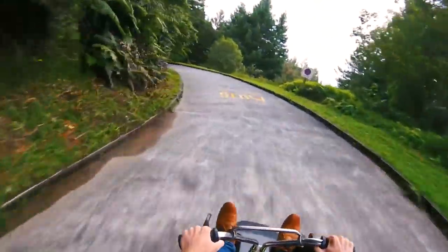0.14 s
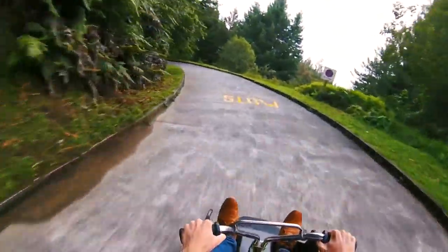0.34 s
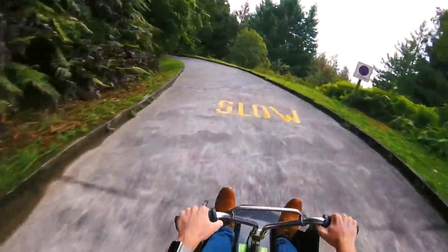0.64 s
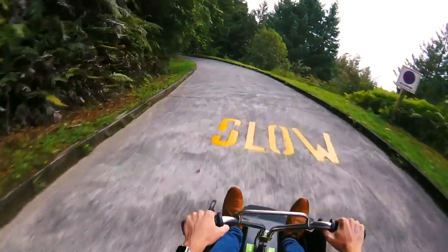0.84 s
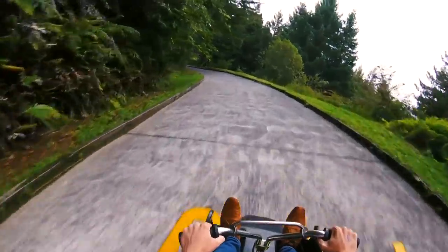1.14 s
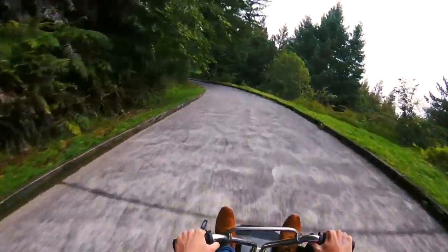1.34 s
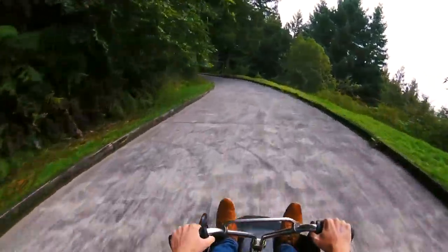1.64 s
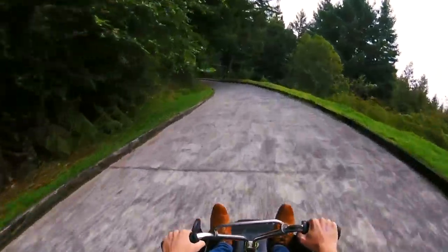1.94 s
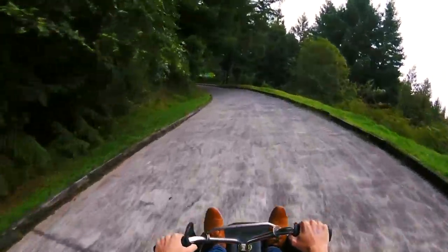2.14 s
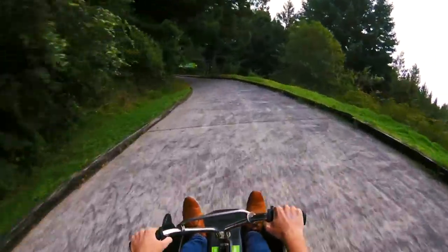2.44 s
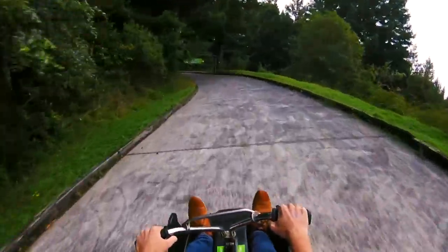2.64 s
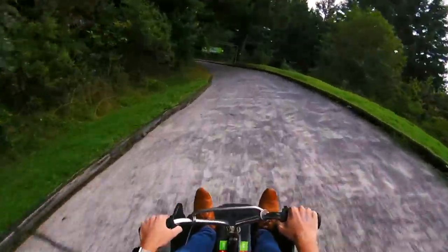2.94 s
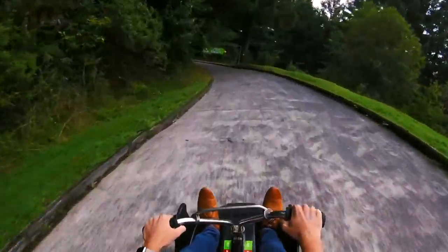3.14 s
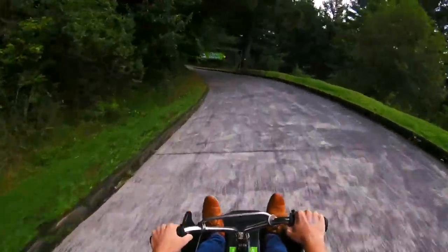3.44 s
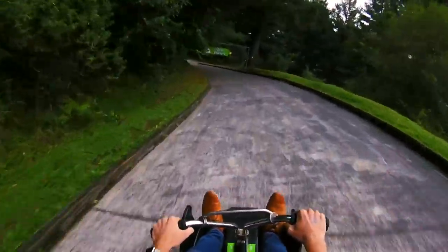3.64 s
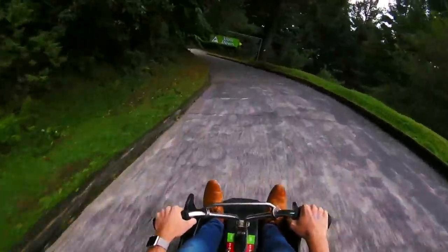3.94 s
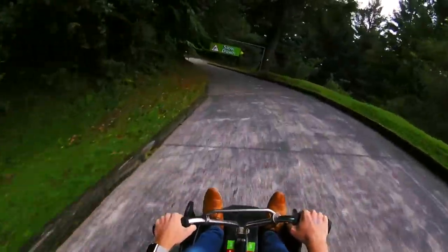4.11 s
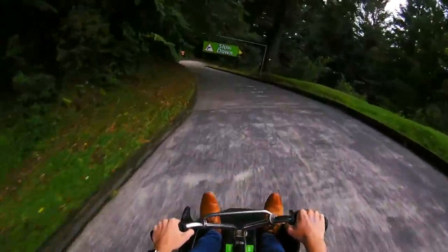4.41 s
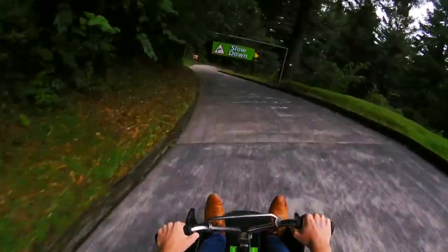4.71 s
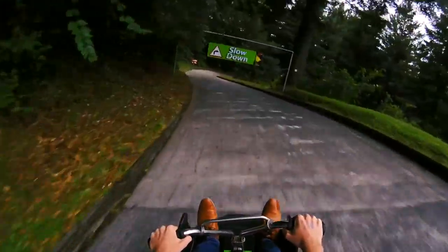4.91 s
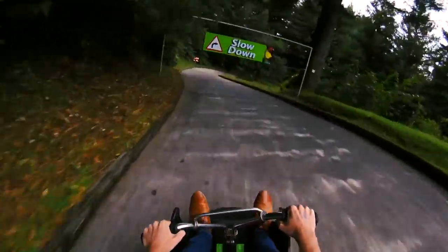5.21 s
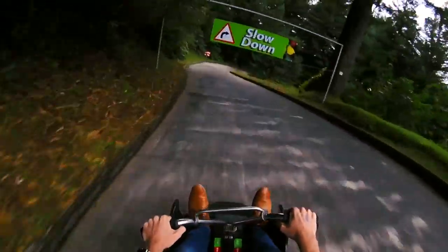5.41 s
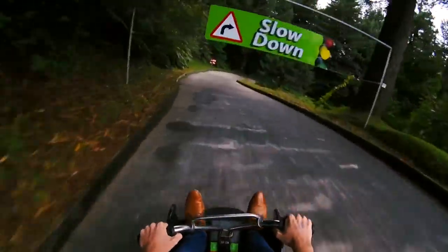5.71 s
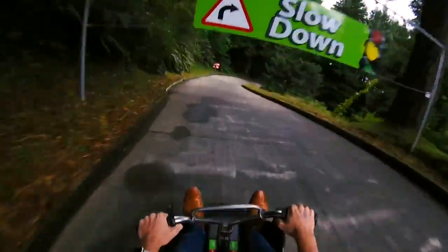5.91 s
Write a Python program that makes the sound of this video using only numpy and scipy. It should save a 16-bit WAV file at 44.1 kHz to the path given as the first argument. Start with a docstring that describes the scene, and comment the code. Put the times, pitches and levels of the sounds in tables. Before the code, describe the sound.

Heard from a microphone worn by the rider outdoors, a plastic cart speeds down rough concrete. A hollow, lumpy rumble and rapid thumps mix with gritty wheel grinding, sand crackle and rattling fittings. Metal chatters midway and the steering column raps. Near the end the surface smooths, the rattle eases, and creaks, a thin whine, swelling low wind and a rough groan emerge.

```python
"""A luge cart coasts fast down a concrete track, heard by a microphone worn by the rider.
From the start, grit and bumps excite the shell, seat and panels; hard wheels grind, knock and scrape through
the frame, sand cracks, joints tap and loose fittings rattle, all as impacts filtered by resonant parts.
Ticks join early; from 2 s a metal part chatters, and from 3 to 3.6 s the steering column raps. After 5.1 s the
concrete is smooth: creaks, a thin whine and a late groan of resonant noise stand out as the air's noise grows."""
import sys
import numpy as np
from scipy import signal
from scipy.fft import rfft, irfft
from scipy.io import wavfile
from scipy.ndimage import uniform_filter1d, minimum_filter1d

SR = 44100
rng = np.random.default_rng(int(sys.argv[2]) if len(sys.argv) > 2 else 0)


def master_out(mix):
    """Clip the mix to full scale and print it as 16-bit PCM to the path in sys.argv[1]."""
    frames = np.transpose(np.atleast_2d(mix))
    ceiling = np.clip(frames, -1, 1)
    pcm = np.round(ceiling * 32767).astype(np.int16)
    wavfile.write(sys.argv[1], SR, pcm)


N = 267246

# bumps that thump the shell: (time [s], level [dB], pitch [Hz])
BUMPS = [(.037, -13.5, 179), (.099, -24, 204), (0.15, -13, 170), (.221, -18.5, 188), (0.295, -22, 180),
         (.411, -16, 204), (.462, -20, 185), (0.501, -14, 188), (0.582, -14.5, 159), (.697, -18.5, 182),
         (.789, -21, 167), (0.87, -17, 172), (0.98, -20, 190), (1.07, -19.5, 185), (1.142, -14.5, 166.6),
         (1.187, -16, 180), (1.259, -18, 216), (1.318, -18, 183), (1.389, -24, 189), (1.465, -19, 190),
         (1.535, -11.5, 174), (1.666, -18, 182), (1.762, -14.5, 190), (1.81, -19, 204), (1.957, -22, 208),
         (2.04, -16, 177), (2.185, -18, 192), (2.255, -15.5, 178), (2.343, -14, 174.5),
         (2.523, -18.5, 171.4), (2.596, -15, 176), (2.687, -15, 223), (2.74, -19, 182), (2.792, -26, 188),
         (2.826, -15, 194), (2.922, -22, 202), (3.011, -13.5, 179), (3.114, -23, 194), (3.326, -16.5, 178),
         (3.442, -16.5, 178), (3.505, -19, 163), (3.588, -18, 198), (3.653, -13, 177.5), (3.78, -14, 186),
         (3.935, -18.5, 191), (4.157, -20, 213), (4.24, -17, 171), (4.362, -15.5, 175), (4.455, -14.5, 186),
         (4.523, -19, 178), (4.565, -17, 207), (4.656, -14.5, 197), (4.732, -17.5, 183),
         (4.769, -15.5, 165), (4.873, -22.5, 195), (4.905, -19, 203), (5.055, -19.5, 192),
         (5.097, -16.5, 182), (5.18, -19, 194), (5.223, -27, 190), (5.388, -23, 167), (5.522, -17, 161),
         (5.647, -20.5, 191), (5.987, -16.5, 203)]
# broad colour of the plastic panels: (frequency [Hz], gain [dB])
PANEL_COLOUR = [(150, -38), (280, 8.5), (380, -1), (550, -3), (700, -10), (900, -22.5), (1400, -34.5),
                (4000, -83), (12000, -100)]


def undb(db):
    """Amplitude gain is 10 to the power of decibels over 20."""
    return 10 ** (np.asarray(db) / 20)


def unit(x):
    """Normalization: scale to a root mean square of 1."""
    return x / np.sqrt(np.mean(x ** 2))


def power(x, size):
    """Short-time power: running mean square over size samples."""
    return np.maximum(uniform_filter1d(x ** 2, size), 1e-14)


def even(x, size):
    """Envelope normalization: hold the running rms near 1, keeping the finer grain."""
    return x / np.sqrt(uniform_filter1d(power(x, size), size))


def walk(length_s):
    """Low-pass noise: smooth random wandering with a spread of 1, averaged twice over length_s."""
    size = max(int(length_s * SR), 1)
    once = uniform_filter1d(rng.standard_normal(N), size, mode="wrap")
    return unit(uniform_filter1d(once, size, mode="wrap"))


def curves(table):
    """Linear interpolation: the columns of a table, joined by straight lines in time."""
    s, *columns = np.transpose(table)
    return [np.interp(np.arange(N) / SR, s, c) for c in columns]


def response(colour, modes=(), size=8192):
    """Minimum-phase impulse response of a part with a broad colour and a few resonances."""
    f = np.maximum(np.fft.rfftfreq(size, 1 / SR), 1)
    hz, db = np.transpose(colour)
    db = np.interp(np.log(f), np.log(hz), db)
    for centre, width, lift in modes:
        db = db + lift / (1 + (2 * (f - centre) / width) ** 2)
    # folding the cepstrum onto positive time makes the response causal
    cepstrum = irfft(np.log(undb(db)))
    cepstrum[1:size // 2] *= 2
    cepstrum[size // 2 + 1:] = 0
    return irfft(np.exp(rfft(cepstrum)))[:size // 2]


def ring(x, part):
    """Linear response: a force convolved with a part's impulse response."""
    return signal.fftconvolve(x, part)[:len(x)]


def add(out, s, x):
    """Superposition: mix x into out from time s."""
    i = max(int(s * SR), 0)
    out[i:i + len(x)] += x[:max(N - i, 0)]


def impacts(per_s, spread_db):
    """Random point process: impulses of scattered size."""
    sizes = undb(spread_db * np.clip(rng.standard_normal(N), -2, 2))
    return (rng.random(N) < per_s / SR) * sizes


def scuff(decay_s, size=2048):
    """Contact envelope: grip builds to a peak at decay_s, then dies away."""
    age = np.arange(size) / (decay_s * SR)
    return age * np.exp(-age)


def blows(table, part, decay_s, size):
    """Rough contact: each blow is a noise burst ringing the part, its level the peak rms over size samples."""
    out, fade = np.zeros(N), scuff(decay_s)
    for (s, db), grit in zip(table, rng.standard_normal((len(table), len(fade)))):
        hit = signal.fftconvolve(grit * fade, part)
        add(out, s, hit * undb(db) / np.sqrt(power(np.pad(hit, size), size).max()))
    return out


def jolts(table, part, size):
    """Impulse excitation: each jolt is one clean push, its level the peak rms over size samples."""
    out = np.zeros(N)
    hit = part / np.sqrt(power(np.pad(part, size), size).max())
    for s, db in table:
        add(out, s, hit * undb(db))
    return out


def booms(table, colour, width_hz, lift_db, size):
    """Load-dependent resonance: each push rings the plastic at a pitch set by how it is loaded."""
    return sum(jolts([(s, db)], response(colour, [(hz, width_hz, lift_db)]), size) for s, db, hz in table)


def shaking(per_s, spread_db, decay_s, smooth, grit_per_s):
    """Clustered collisions: separate grit hits, bunched into loose contacts over a smooth rolling share."""
    energy = np.maximum(ring(impacts(per_s, spread_db) ** 2, scuff(decay_s) ** 2), 0)
    strength = np.sqrt(energy / energy.mean() + smooth ** 2)
    return strength * impacts(grit_per_s, 1.4) * np.sign(rng.standard_normal(N))


def aftershake(table):
    """Transient vibration: a quick swell and a fade after each blow, 1 at its strongest."""
    push, fade = np.zeros(N), scuff(decay_s=0.0078, size=8192)
    for s, db in table:
        add(push, s, fade * undb(db))
    return push / push.max()


def shell(boom_db, growl_db):
    """Structural resonance: concrete grain booms in the hollow shell and growls in its panels; bumps thump it."""
    # broad colour of the shell: (frequency [Hz], gain [dB])
    shell_colour = [(20, -44.5), (45, -28.5), (90, -28), (130, -2.5), (170, 6), (240, 2.5), (300, -8.5),
                    (370, -25), (600, -23), (2000, -71.5), (9000, -115)]
    # resonances of the shell: (frequency [Hz], width [Hz], lift above the colour [dB])
    shell_modes = [(181, 160, 0), (302.2, 12, 4.5)]
    # resonances of the panels: (frequency [Hz], width [Hz], lift above the colour [dB])
    panel_modes = [(421, 61, 5.8), (530, 110, 1.4), (685, 61, 2.2)]
    # thuds of the plastic panels: (time [s], level [dB], pitch [Hz])
    thud_times = [(.235, -19.5, 514), (.428, -26, 458), (.769, -17, 484), (1.019, -17, 515),
                  (1.829, -19.5, 503), (1.945, -16.5, 466), (2.096, -21, 505), (2.149, -28, 554),
                  (2.562, -21.5, 540), (2.611, -12, 560), (2.693, -27, 657), (2.860, -20, 530),
                  (4.168, -23, 503), (4.336, -17.5, 545), (4.457, -23, 544), (5.022, -16.5, 493),
                  (5.788, -17, 540), (5.920, -18, 401)]
    grain = impacts(3000, 0.81) * rng.standard_normal(N)
    boom = even(ring(grain, response(shell_colour, shell_modes)), size=800)
    contacts = shaking(per_s=190, spread_db=4.5, decay_s=0.0015, smooth=1.0, grit_per_s=2000)
    growl = even(ring(contacts, response(PANEL_COLOUR, panel_modes)), size=1000)
    thumps = booms(BUMPS, shell_colour, width_hz=42, lift_db=15, size=600)
    thuds = booms(thud_times, PANEL_COLOUR, width_hz=260, lift_db=14.5, size=260)
    return boom * undb(boom_db) + growl * undb(growl_db) + thumps + thuds


def seat():
    """Impulsive excitation of a plate mode: hard shoves make the seat pan boom."""
    # shoves into the seat pan: (time [s], level [dB])
    shoves = [(.025, -22.5), (.204, -31), (1.102, -21), (1.313, -24), (2.06, -18.5), (2.334, -18),
              (2.837, -18.5), (2.996, -19), (3.135, -18), (3.23, -17.5), (3.637, -21.5), (3.911, -20.5),
              (4.44, -20), (4.876, -25.5)]
    # resonance of the seat pan: (frequency [Hz], width [Hz], lift above the panel colour [dB])
    seat_modes = [(265, 78, 13.5)]
    return jolts(shoves, response(PANEL_COLOUR, seat_modes), size=700)


def drone():
    """Narrow-band resonance: rolling keeps panel modes singing; their notes wander as the plastic flexes."""
    # singing panel modes, low then high: (frequency [Hz], width [Hz])
    drone_modes = [(310, 16), (520, 38)]
    # their levels: (time [s], low note level [dB], high note level [dB])
    drone_levels = [(0, -42, -35.5), (2.45, -34.5, -37.5), (3.15, -39.5, -33.5), (4.0, -28.5, -39.5),
                    (4.35, -30, -33.5), (4.55, -33, -39.5), (4.82, -30.5, -28), (5.04, -25, -30),
                    (5.13, -45.5, -47), (6.06, -25, -44)]
    flex_share, flex_s = .035, .06  # spread of the pitch and averaging time of its wander
    out = 0
    for (hz, width), db in zip(drone_modes, curves(drone_levels)):
        swing = walk(1 / width) + 1j * walk(1 / width)
        phase = 2 * np.pi * np.cumsum(hz * (1 + flex_share * walk(flex_s))) / SR
        note = np.real(swing * np.exp(1j * phase))
        out = out + even(note, size=3000) * undb(db)
    return out


def wheels(grind_db, knocks):
    """Rolling contact: hard wheels grind over grit, knock through the frame and scrape on coarse spots."""
    # broad colour of the frame: (frequency [Hz], gain [dB])
    frame_colour = [(250, -11), (600, 5.5), (850, 0.5), (1800, -6), (2500, -14), (3300, -15), (4500, -21.5),
                    (6500, -24.5), (9000, -44.5), (14000, -74.5)]
    # resonances of the frame: (frequency [Hz], width [Hz], lift above the colour [dB])
    frame_modes = [(767, 170, 4), (990, 12, -1.5), (1043, 59, -8.5), (1103, 29, 9.5), (1350, 120, 1),
                   (1917, 59, 5), (2060, 100, 0.5), (2460, 140, 5.5)]
    # longer scrapes of the wheels: (time [s], level [dB])
    scrapes = [(.793, -32), (.897, -27), (1.314, -30), (4.975, -34), (5.215, -28)]
    frame = response(frame_colour, frame_modes)
    contacts = shaking(per_s=190, spread_db=8.5, decay_s=0.0022, smooth=1.0, grit_per_s=3500)
    grind = even(ring(contacts, frame), size=1300)
    knocking = blows(knocks, frame, decay_s=.0035, size=200)
    scraping = blows(scrapes, frame, decay_s=.008, size=500)
    return grind * undb(grind_db) + knocking + scraping


def steering_column():
    """Tube resonance: brief rough contacts rap the hollow steering column."""
    # raps of the column: (time [s], level [dB])
    rap_times = [(3.083, -18.5), (3.098, -27.5), (3.179, -21), (3.227, -27), (3.321, -21), (3.438, -29),
                 (3.487, -36), (3.529, -25), (3.555, -21.5), (3.589, -23.5)]
    # broad colour of the column: (frequency [Hz], gain [dB])
    column_colour = [(250, -9.5), (520, 19), (900, -7.5), (1500, -10), (1750, 0.5), (1950, 2), (2300, -16),
                     (4000, -20), (12000, -55)]
    return blows(rap_times, response(column_colour), decay_s=.0025, size=200)


def crackle(rough_db):
    """Granular impact noise: loose sand cracks under the wheels in flurries, louder on coarse concrete."""
    # broad colour of cracking sand: (frequency [Hz], gain [dB])
    sand_colour = [(400, -4.5), (1100, 11), (2200, 1.5), (3400, -10), (5600, -3), (6800, -22),
                   (10000, -34.5), (14000, -41)]
    sand_db, sand_slope = -46, 1.4  # level on usual concrete, dB gained per dB of roughness
    flurries = undb(3 * walk(length_s=.03))
    grains = impacts(per_s=170, spread_db=4) * np.sign(rng.standard_normal(N)) * flurries
    return even(ring(grains, response(sand_colour)), size=8000) * undb(sand_db + sand_slope * rough_db)


def fittings(rattle_db, clacks):
    """Intermittent contact: loose fittings rattle on separate notes over rolling hiss; jolts make them rebound."""
    # broad colour of the fittings: (frequency [Hz], gain [dB])
    fitting_colour = [(500, -9), (1500, 1), (2400, 2), (3600, -8.5), (4400, 1), (5000, 3.5), (5900, 0),
                      (6700, -26), (8200, -22), (10500, -32.5), (14000, -55)]
    # one resonance for each fitting: (frequency [Hz], width [Hz], lift above the colour [dB])
    fitting_modes = [(4515, 120, 12.5), (4700, 81, 11.5), (5430, 250, 13), (5760, 85, 10.5),
                     (5960, 120, 17.5)]
    rebound_s, scatter_s, rebound_db = 0.021, 0.0038, -5  # delay, its spread, level relative to first clack
    part = response(fitting_colour)
    rattle = 0
    for mode in fitting_modes:
        force = shaking(per_s=55, spread_db=4, decay_s=.0014, smooth=.3, grit_per_s=6000)
        rattle = rattle + ring(force, response(fitting_colour, [mode]))
    hiss = unit(ring(rng.standard_normal(N), part))
    loose = np.clip((rattle_db + 64.5) / 9, .2, .9)  # share of the power that is rattle
    bed = np.sqrt(loose) * even(rattle, size=1800) + np.sqrt(1 - loose) * hiss
    rebounds = [(s + rebound_s + scatter_s * rng.standard_normal(), db + rebound_db) for s, db in clacks]
    return bed * undb(rattle_db) + blows(clacks + rebounds, part, decay_s=.0012, size=45)


def clatter(patch_db):
    """Random impact excitation: loose frame joints tap, each on its own note, and clank on hard jolts."""
    # level of the tapping: (time [s], level [dB])
    tap_levels = [(0, -46), (.3, -43.5), (.6, -40.5), (1.1, -44.5), (1.5, -47.5), (1.85, -42.5),
                  (2.3, -44.5), (2.45, -51), (2.75, -46), (3.3, -38), (3.58, -44), (3.8, -49), (5.0, -47),
                  (5.4, -47.5), (6.06, -52)]
    # broad colour of the joints: (frequency [Hz], gain [dB])
    joint_colour = [(300, -25.5), (800, 11), (2400, 0.5), (3400, -24), (5000, -13.5), (12000, -57)]
    # notes of the tapping joints: (frequency [Hz], width [Hz], lift above the colour [dB])
    joint_modes = [(954, 430, 17), (1123, 91, 13.6), (1425, 260, 15.3), (1660, 480, 14), (1906, 330, 18.7),
                   (2360, 390, 16.3)]
    # hard clanks: (time [s], level [dB])
    clank_times = [(.145, -33), (.48, -28), (.901, -24), (.909, -28.5), (2.833, -28.5)]
    # notes of the clanks: (frequency [Hz], width [Hz], lift above the colour [dB])
    clank_modes = [(925, 39, 14), (1210, 70, 6.1), (1286, 84, 5.5)]
    taps = 0
    for mode in joint_modes:
        force = shaking(per_s=38, spread_db=4, decay_s=.0008, smooth=.05, grit_per_s=6000)
        taps = taps + ring(force, response(joint_colour, [mode]))
    clanks = blows(clank_times, response(joint_colour, clank_modes), decay_s=.002, size=300)
    return even(taps, size=4000) * undb(curves(tap_levels)[0] + patch_db) + clanks


def chatter():
    """Position-dependent modes: a loose metal part lands differently each strike, shifting its resonances."""
    # strikes of the metal part: (time [s], level [dB])
    strikes = [(2.037, -30.5), (2.045, -26), (2.054, -24), (2.062, -27), (2.071, -29), (2.3592, -30),
               (2.3658, -29), (2.3813, -29), (2.5248, -30), (2.596, -36), (2.605, -29.5), (2.832, -34),
               (2.989, -28.5), (3.019, -33), (3.028, -30), (3.0369, -26), (3.045, -29), (3.342, -24.5),
               (3.355, -27.5), (3.6657, -33.5), (3.789, -27.5), (5.53, -34.5)]
    # broad colour of the metal: (frequency [Hz], gain [dB])
    metal_colour = [(400, 1.5), (1300, 4.5), (2200, 2.5), (2800, -1), (4200, -5.5), (5500, 5), (6500, -9.5),
                    (7900, -9), (9000, -25), (10400, -21.5), (11500, -42), (14000, -53)]
    # central resonances of the metal: (frequency [Hz], width [Hz], lift above the colour [dB])
    metal_modes = [(1890, 75, 13), (4620, 130, 6.1), (5590, 570, 7)]
    scatter_share = 0.017  # spread of each note from strike to strike
    out = np.zeros(N)
    for strike, chance in zip(strikes, rng.standard_normal((len(strikes), len(metal_modes)))):
        modes = [(hz * (1 + scatter_share * c), width, lift)
                 for (hz, width, lift), c in zip(metal_modes, chance)]
        out += blows([strike], response(metal_colour, modes), decay_s=.0008, size=70)
    return out


def ticking():
    """Impulse response: each sharp dry tick is one clean push through a broad colour."""
    # ticks: (time [s], level [dB])
    tick_times = [(.157, -37), (.592, -37), (1.307, -31), (1.543, -34), (1.671, -31), (2.352, -27),
                  (2.607, -44), (3.667, -30), (3.79, -27), (5.0484, -19.5), (5.0997, -35)]
    # their broad colour: (frequency [Hz], gain [dB])
    tick_colour = [(300, 0), (2000, 0), (6000, -6), (9000, -16), (14000, -35)]
    return jolts(tick_times, response(tick_colour), size=45)


def creaking():
    """Brief friction: short noise bursts through a broad colour make dry creaks."""
    # creaks: (time [s], level [dB])
    creak_times = [(5.139, -36.5), (5.843, -31), (5.853, -36), (5.892, -39), (5.945, -35), (5.968, -37)]
    # their broad colour: (frequency [Hz], gain [dB])
    creak_colour = [(800, -6), (1900, -2), (2600, -9), (3300, 0), (3900, -9), (4800, -4), (5900, -2),
                    (7000, -22), (14000, -46)]
    return blows(creak_times, response(creak_colour), decay_s=0.0015, size=45)


def rubbing(swell, colour, modes, waver_db):
    """Friction-driven resonance: noise sings in a mode as it swells and fades, wavering with the grip."""
    db, = curves(swell)
    grip = walk(length_s=0.0073)
    sounding = np.arange(N) / SR > swell[0][0]
    tone = even(ring(rng.standard_normal(N), response(colour, modes)), size=1200)
    return tone * undb(db + waver_db * grip) * sounding


def groan():
    """Friction-driven low resonance: a rough groan as the cart nears the bend."""
    # level before the waver: (time [s], level [dB])
    groan_swell = [(5.8, -57), (5.875, -27.5), (5.93, -18.5), (5.975, -29), (6.06, -26)]
    # broad colour: (frequency [Hz], gain [dB])
    groan_colour = [(100, -35), (260, -4), (400, -3), (700, -11), (950, -7), (1300, -17), (3000, -36),
                    (12000, -75)]
    # resonance: (frequency [Hz], width [Hz], lift above the colour [dB])
    groan_modes = [(302, 120, 12.6)]
    return rubbing(groan_swell, groan_colour, groan_modes, waver_db=1.5)


def whine():
    """Friction-driven high resonance: a faint thin whine on the smooth stretch."""
    # level before the waver: (time [s], level [dB])
    whine_swell = [(5.29, -77), (5.34, -49), (5.62, -50.5), (5.9, -64)]
    # broad colour: (frequency [Hz], gain [dB])
    whine_colour = [(1500, -16), (2700, 4.5), (4000, -12), (5200, -5), (6000, -6), (6600, -19),
                    (12000, -46)]
    # resonance: (frequency [Hz], width [Hz], lift above the colour [dB])
    whine_modes = [(5120, 360, 9)]
    return rubbing(whine_swell, whine_colour, whine_modes, waver_db=-1.0)


def wind():
    """Turbulent flow noise: air buffets the microphone, more towards the bend, and rushes faintly and steadily."""
    # colour of the buffeting: (frequency [Hz], gain [dB])
    buffet_colour = [(15, -18.5), (32, -19.5), (48, 0.5), (75, 1.5), (110, 1.5), (300, -41.5), (4000, -100)]
    # colour of the steady rush: (frequency [Hz], gain [dB])
    rush_colour = [(1000, -15.5), (6000, 4), (8500, -2), (11000, -14.5), (14000, -20.5)]
    buffet_db, rush_db = -49, -61  # the buffeting's level before it rises
    rise_from_s, rise_db_per_s = 5.23, 14
    rise_db = rise_db_per_s * np.maximum(np.arange(N) / SR - rise_from_s, 0)
    buffeting = even(ring(rng.standard_normal(N), response(buffet_colour)), size=6000)
    rush = unit(ring(rng.standard_normal(N), response(rush_colour)))
    return buffeting * undb(buffet_db + rise_db) + rush * undb(rush_db)


def scene():
    """Common excitation: the same roughness and jolts drive many parts, whose sounds superpose."""
    # jolts of the wheels: (time [s], knock through the frame [dB], clack of the fittings [dB])
    wheel_jolts = [(.104, -43, -39), (0.32, -39, -34), (0.355, -27.5, -50), (0.445, -28.5, -52),
                   (.547, -48, -32), (.577, -23.5, -31.5), (0.632, -42, -38), (0.741, -40, -32),
                   (.780, -35, -27.5), (.800, -43, -31), (.903, -37, -30.5), (0.969, -40, -31.5),
                   (1.028, -26, -31), (1.147, -40, -30.5), (1.306, -28, -28), (1.542, -38, -32.5),
                   (1.657, -25.5, -34.5), (1.669, -32, -31), (1.818, -27.5, -46), (1.915, -27, -32),
                   (1.948, -25.5, -41), (2.051, -37, -33), (2.199, -39, -38), (2.358, -32, -37),
                   (2.609, -26, -47), (2.695, -28.5, -36), (2.787, -37, -50), (2.835, -34.5, -32),
                   (3.341, -34, -37), (3.787, -45, -38), (3.966, -31, -48), (4.095, -42, -40),
                   (4.124, -28, -28), (4.408, -29.5, -33), (4.46, -30, -30), (4.485, -42, -40),
                   (4.583, -38, -31.5), (4.693, -33, -33.5), (4.734, -31, -40), (4.896, -41, -41),
                   (4.978, -24.5, -31.5), (5.185, -29, -30), (5.201, -34, -32)]
    # roughness of the concrete: (time [s], level above the usual [dB])
    roughness = [(0, 4), (0.25, -1), (0.52, 4.5), (1.0, 1.5), (1.33, 3), (1.46, -1), (1.85, 2.5),
                 (2.0, -0.5), (2.34, 0), (2.44, -3), (2.68, 0.0), (3.3, 2.5), (3.45, 0), (3.62, 1.5),
                 (3.88, -1), (4.62, -1.5), (4.98, 0), (5.3, -2), (5.78, -2.5), (6.04, 1.5)]
    # growl in the panels before patches and shaking: (time [s], level [dB])
    growl_levels = [(0.0, -28.5), (.35, -25.5), (0.5, -21), (.66, -27), (.77, -25), (1.05, -27),
                    (1.3, -24.5), (1.48, -31.5), (1.66, -26.5), (1.94, -23), (2.02, -27), (2.33, -26),
                    (2.45, -33), (2.56, -29.5), (3.08, -27), (3.3, -24.5), (3.6, -25.5), (3.85, -27),
                    (4.2, -25.5), (4.7, -27), (5.02, -23), (5.14, -29.5), (5.22, -26), (5.28, -31.5),
                    (5.36, -27.5), (5.7, -25.5), (6.04, -25)]
    t = np.arange(N) / SR
    knocks = [(s, db) for s, db, _ in wheel_jolts]
    clacks = [(s, db) for s, _, db in wheel_jolts]
    bumped = aftershake([(s, db) for s, db, _ in BUMPS])
    # small patches of coarser and finer concrete pass at random
    patch_db = 1.0 * walk(length_s=0.04)
    rough_db = curves(roughness)[0] + patch_db
    # the cart rolls onto a smooth stretch, where the shell calms down
    smooth_from_s, smooth_fade_s, smooth_boom_db = 5.11, 0.022, -3
    smooth = np.clip((t - smooth_from_s) / smooth_fade_s, 0, 1)
    # the boom also comes in random lumps
    lump_db = 3.5 * walk(length_s=0.014)
    # base level on usual concrete plus dB gained per dB of roughness, then the lumps and the drop on the smooth
    # stretch
    boom_db = -24.8 + 0.36 * rough_db + lump_db + smooth_boom_db * smooth
    growl_db = curves(growl_levels)[0] + patch_db + 4 * bumped
    grind_db = -38 + 1.5 * rough_db + 5.5 * aftershake(knocks)
    rattle_db = -49 + 2.03 * rough_db + 9.5 * aftershake(clacks)
    plastic = shell(boom_db, growl_db) + seat() + drone()
    rolling = wheels(grind_db, knocks) + steering_column() + crackle(rough_db)
    loose_parts = fittings(rattle_db, clacks) + clatter(patch_db) + chatter() + ticking() + creaking()
    friction = groan() + whine()
    return (plastic + rolling + loose_parts + friction + wind())[None]


def limiter(x, ceiling_db, size=260):
    """Gain reduction: turn down for a few milliseconds round each peak above the ceiling."""
    gain = np.minimum(1, undb(ceiling_db) / (np.abs(x) + 1e-9))
    return x * uniform_filter1d(minimum_filter1d(gain, size), size)


def record(dry):
    """Peak limiting and band limiting: the peaks are held down and the top is cut."""
    top_hz = 14400
    low_pass = signal.ellip(8, .2, 70, top_hz, fs=SR, output="sos")  # .2 dB ripple, 70 dB stopband
    return signal.sosfilt(low_pass, limiter(dry, ceiling_db=-7))


dry = scene()
out = record(dry)
master_out(out)
```